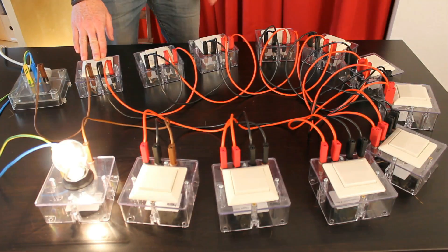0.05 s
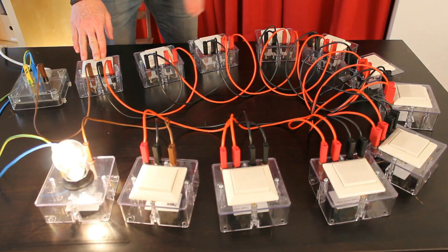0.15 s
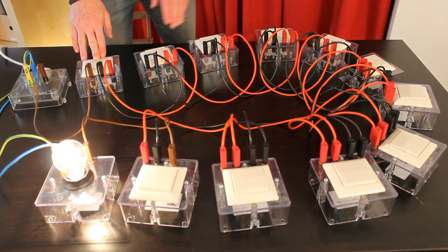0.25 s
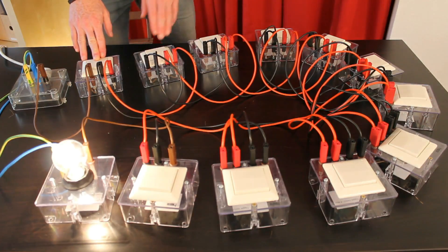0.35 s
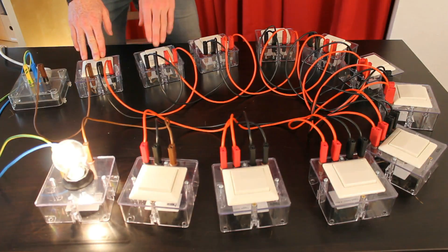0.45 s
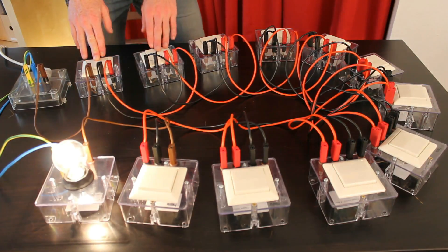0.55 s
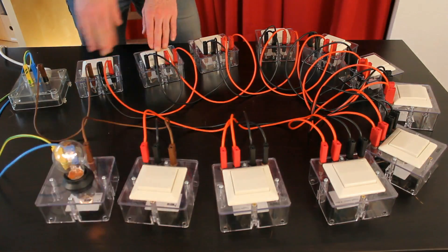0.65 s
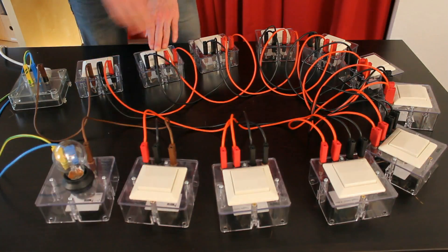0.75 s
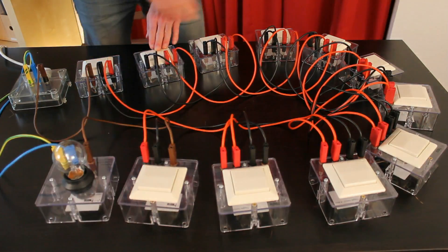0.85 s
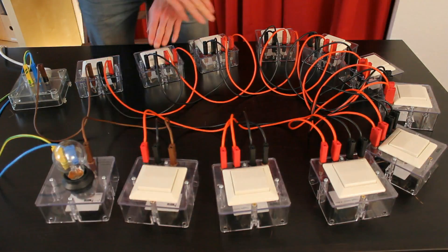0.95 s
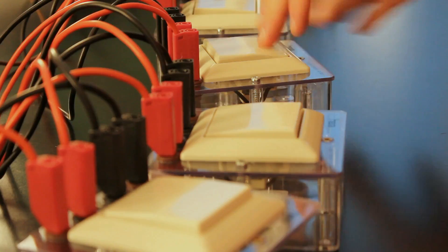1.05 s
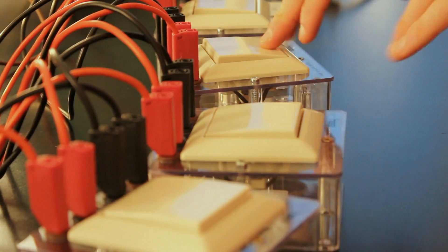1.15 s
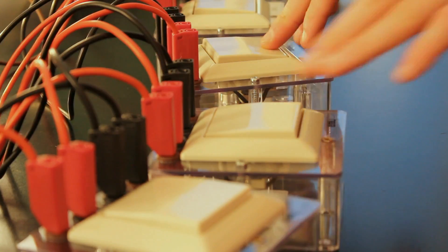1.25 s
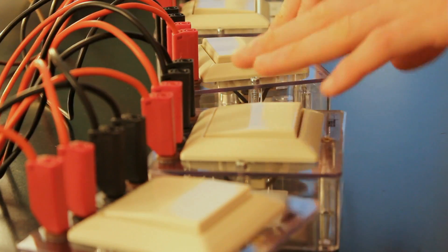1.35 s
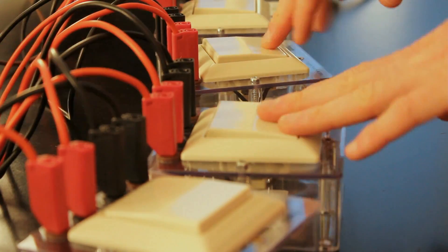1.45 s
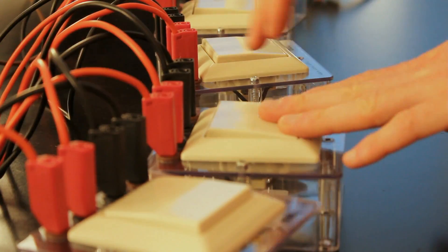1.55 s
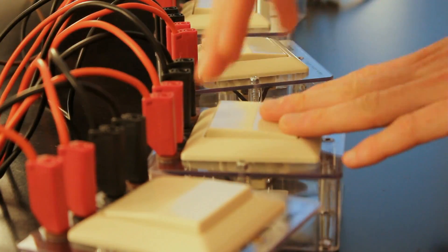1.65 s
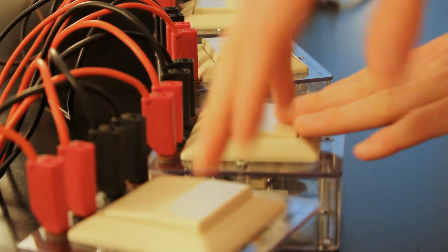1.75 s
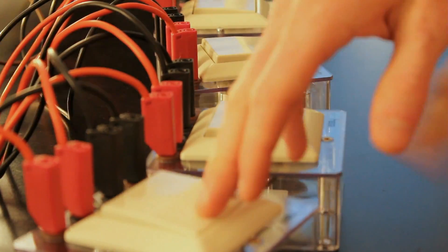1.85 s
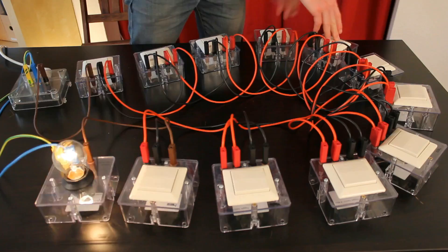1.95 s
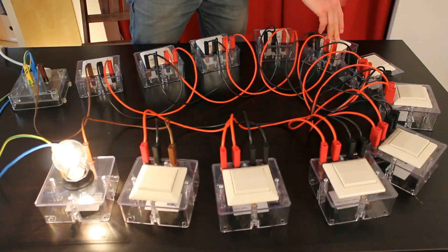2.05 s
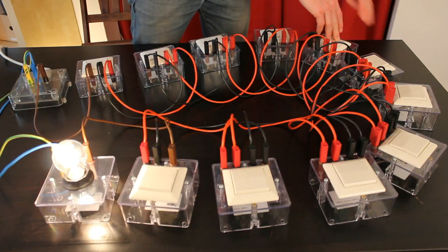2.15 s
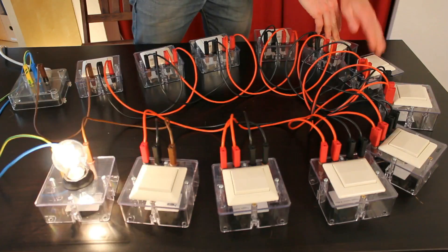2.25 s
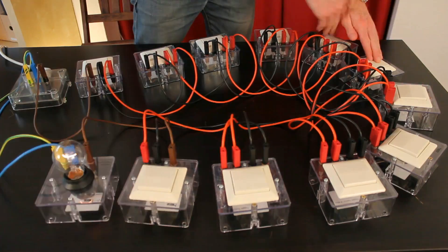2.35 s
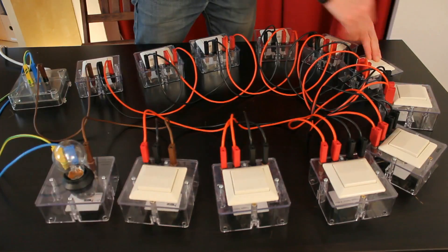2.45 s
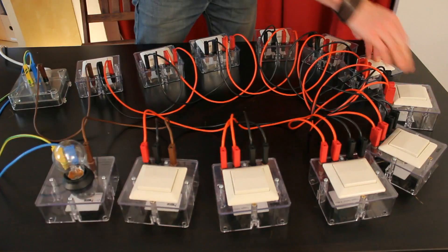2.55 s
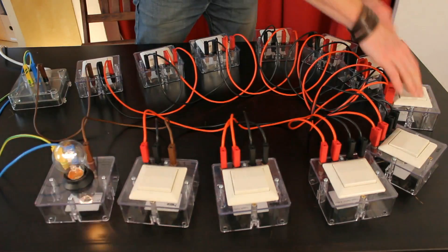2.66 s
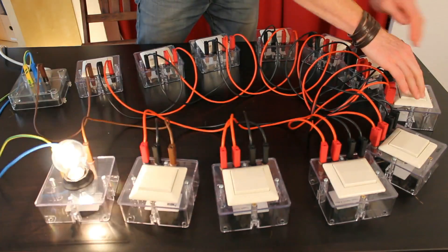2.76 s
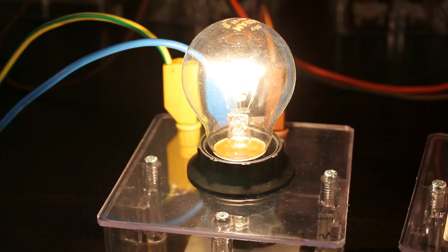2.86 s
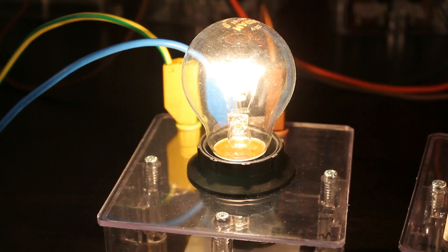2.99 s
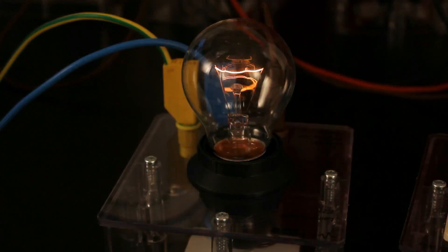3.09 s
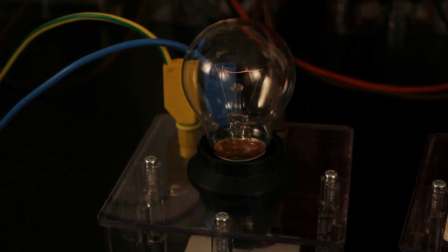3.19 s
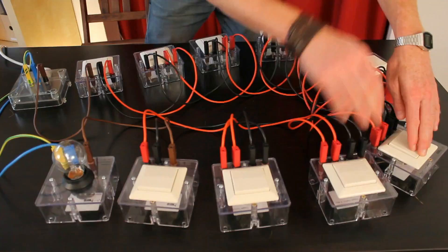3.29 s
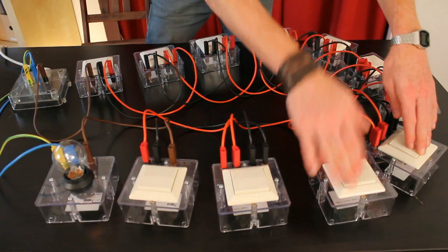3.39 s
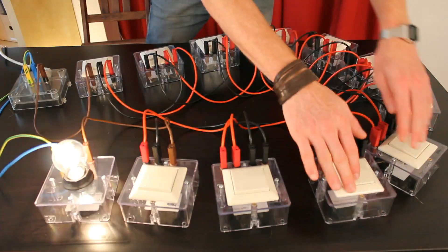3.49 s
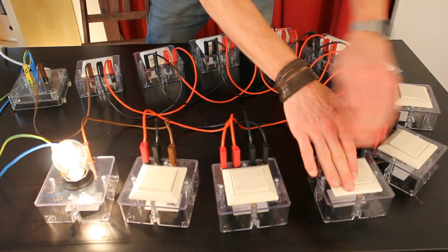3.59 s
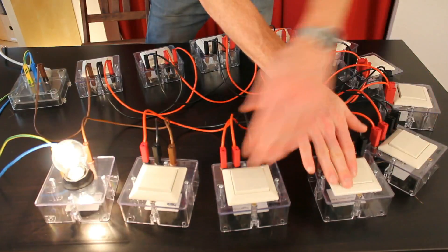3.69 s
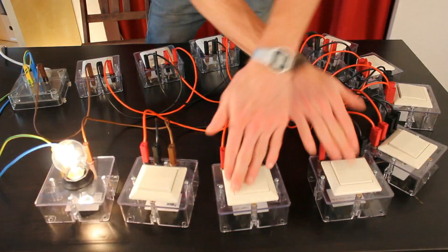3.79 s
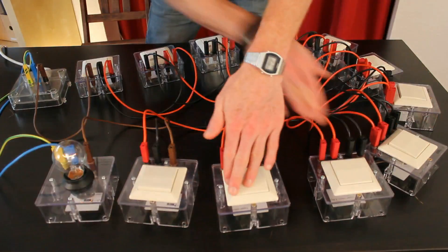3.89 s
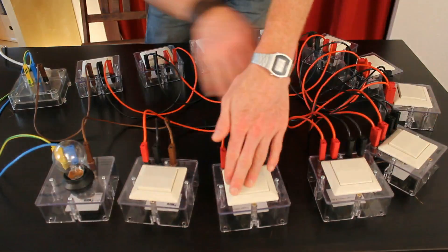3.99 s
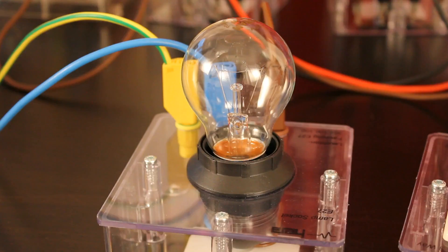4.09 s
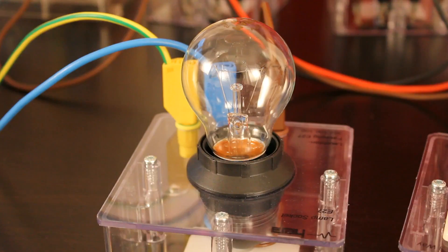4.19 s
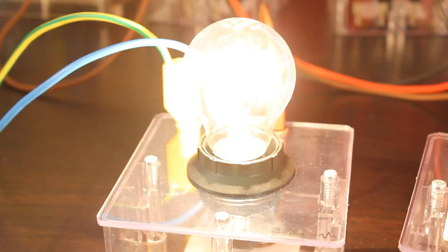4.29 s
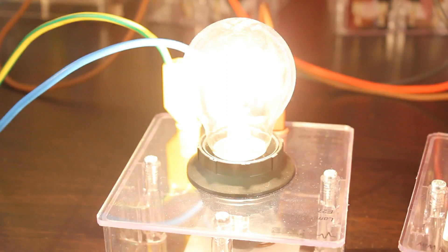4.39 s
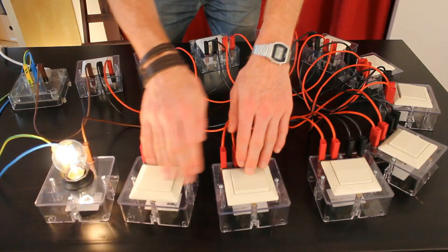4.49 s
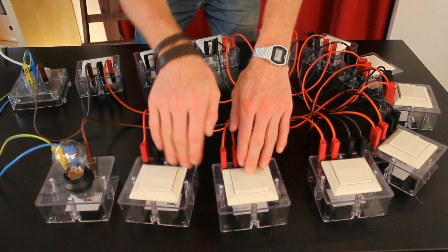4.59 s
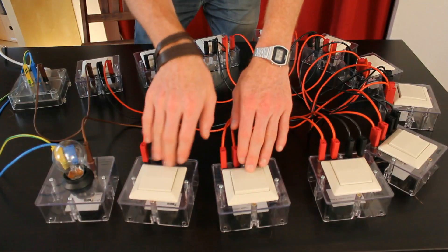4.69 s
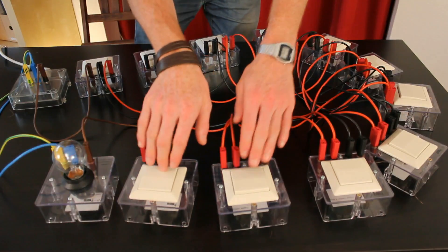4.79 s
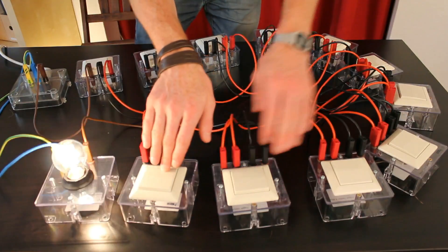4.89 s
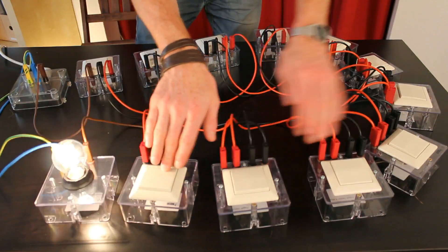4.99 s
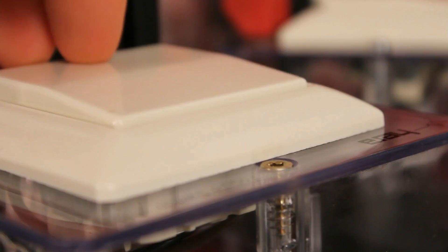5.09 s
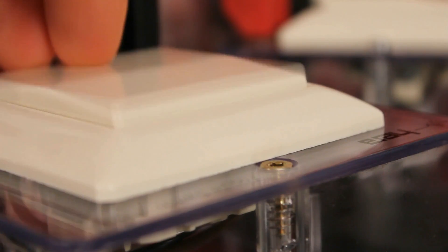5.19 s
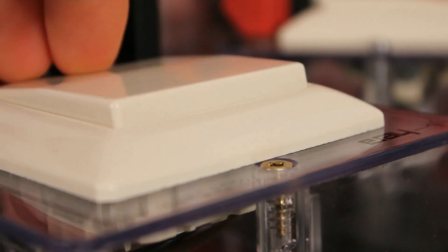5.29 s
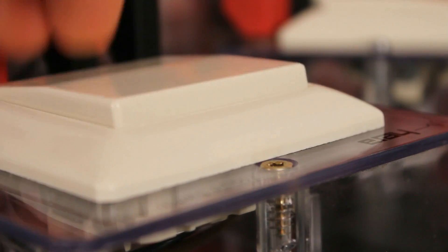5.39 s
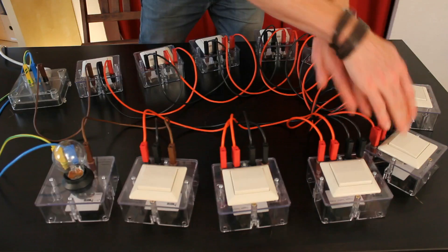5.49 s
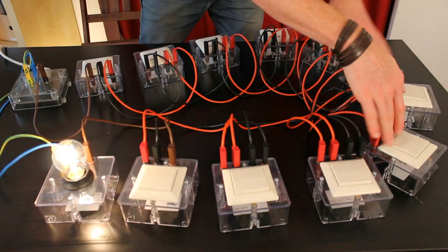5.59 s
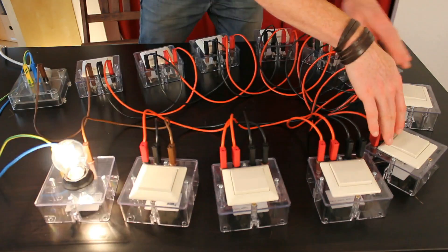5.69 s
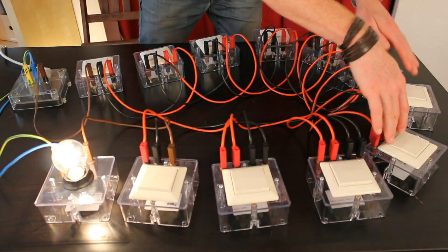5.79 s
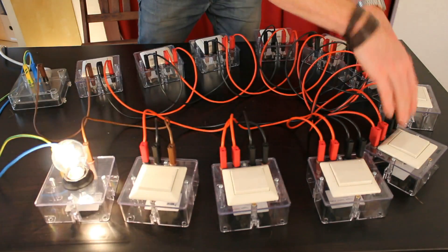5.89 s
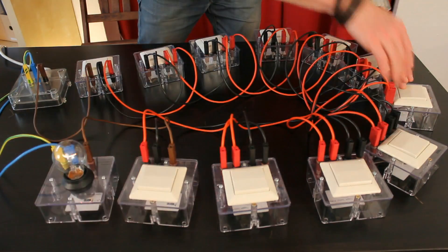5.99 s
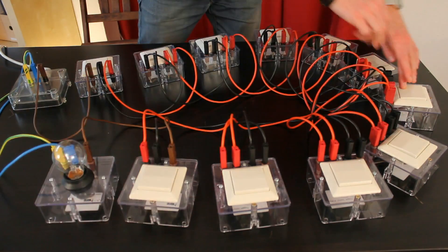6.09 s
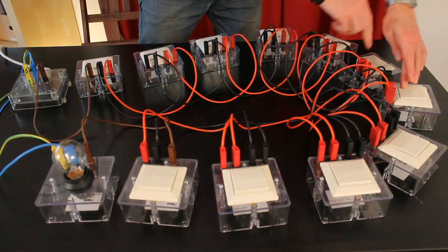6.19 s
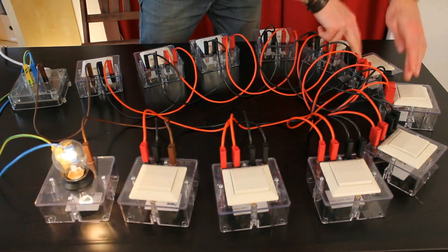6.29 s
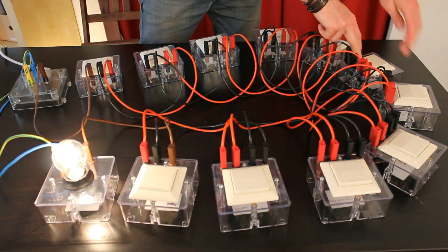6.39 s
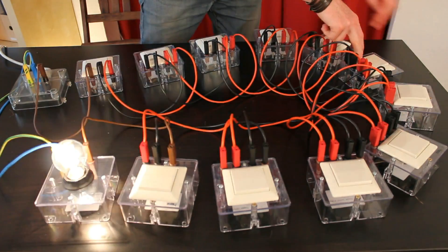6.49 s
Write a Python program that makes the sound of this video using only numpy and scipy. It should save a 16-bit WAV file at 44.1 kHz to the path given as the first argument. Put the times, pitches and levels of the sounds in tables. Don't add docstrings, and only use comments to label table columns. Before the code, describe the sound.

A brisk, even run of crisp plastic switch clacks with tiny metallic ticks and low table thuds, close up in a quiet, slightly live room.

```python
import sys
import numpy as np
from scipy import signal
from scipy.fft import irfft
from scipy.io import wavfile

SR = 44100
rng = np.random.default_rng(int(sys.argv[2]) if len(sys.argv) > 2 else 0)


def generate_wav(sig):
    pcm = np.round(np.clip(np.atleast_2d(sig).T, -1, 1) * 32767).astype(np.int16)
    wavfile.write(sys.argv[1], SR, pcm)


def makeup_ratio(level_db):
    decades = np.asarray(level_db, float) / 20
    return 10 ** decades


N = 288816

# start_s, box_db, table_db, tick_db, long_ring_db
PRESSES = [(0.699, -29, -28, -37.5, -30.5), (1.122, -27.5, -33, -34.5, -29),
           (1.523, -32.5, -33.5, -38.5, -34.5), (2.013, -32.5, -35, -40.5, -33),
           (2.383, -28, -40.5, -45, -33.5), (2.762, -31, -34.5, -37.5, -46),
           (3.127, -26.5, -27.5, -35, -32), (3.503, -33, -34.5, -36, -28.5),
           (3.899, -27.5, -37.5, -36.5, -34.5), (4.293, -26.5, -39, -45, -36),
           (4.59, -27, -32.5, -35.5, -32.5), (4.924, -29.5, -36.5, -40, -44.5),
           (5.275, -27.5, -34.5, -36, -27.5), (5.658, -33.5, -35.5, -37.5, -40),
           (6.021, -34.5, -31, -41.5, -30.5), (6.385, -35, -33.5, -37.5, -34)]
# box_hz, table_hz, long_table_hz, long_box_hz, plate_hz
SWITCHES = [(1110, 401, 330, 1300, 2650), (825, 222, 290, 1200, 3100), (1230, 618, 291, 1100, 4400),
            (1096, 542, 220, 1800, 5300), (890, 527, 250, 1090, 4500), (690, 345, 436, 1235, 3600),
            (1386, 368, 260, 2500, 2800), (1146, 540, 260, 3000, 4800), (870, 217, 339, 1000, 2430),
            (1406, 470, 210, 1200, 3700), (1015, 554, 217, 670, 4300), (860, 570, 150, 980, 2670),
            (1156, 351, 219.5, 1600, 4300), (1010, 388, 250, 1800, 4400), (1490, 270, 260, 1400, 7900),
            (1480, 230, 292, 1800, 8300)]
# pitch_hz, level_db per Hz
TICK = [(1180, -57), (2000, -15.5), (2440, -9.5), (2910, -8.5), (3870, -6), (4450, -3), (5830, -4),
        (8930, -1), (14900, -11), (16000, -32)]
BODY_LAG_S = .0015


def evened(x, count=None):
    return x / np.sqrt(np.mean(x[..., :count] ** 2) + 1e-20)


def read(points, hz):
    f, value = np.transpose(points)
    return np.interp(np.log(hz + 1), np.log(f + 1), value)


def add(mix, s, sound):
    part = mix[:, round(s * SR):][:, :sound.shape[1]]
    part += sound[:, :part.shape[1]]


LENGTH = 12800


def presses(mix):
    for press, switch in zip(PRESSES, SWITCHES):
        s, box_db, table_db, tick_db, ring_db = press
        box_hz, table_hz, low_hz, high_hz, plate_hz = switch
        snap = knock(s, box_db, box_hz, table_db, table_hz, tick_db, TICK, 0.00029, 0.0019, 4.57, plate_hz)
        add(mix, s - .0012, snap)
        add(mix, s - .0008, ping(tick_db + 11, 10200))
        add(mix, s, linger(ring_db, low_hz, 0.28) + linger(box_db - 11.5, high_hz, .27))


def landings(mix):
    # start_s, level_db, skin_tick_db
    fingers = [(0.690, -48, -54), (1.113, -50.5, -55), (1.518, -48.5, -50), (1.994, -58.5, -59),
               (2.005, -37.5, -43.5), (2.380, -41.5, -58), (2.752, -37, -43.5), (3.120, -47, -40.5),
               (3.484, -56, -53), (3.498, -34.5, -37), (3.889, -43, -41.5), (4.286, -39.5, -34),
               (4.583, -43, -37.5), (4.914, -50, -48), (5.267, -42.5, -40), (5.649, -48.5, -48),
               (5.99, -56.5, -71), (6, -51.5, -55.5), (6.358, -63, -65), (6.378, -39.5, -43)]
    palm_hz = 524
    for s, db, tick_db in fingers:
        slap = knock(s, db + 7.5, switch_at(s)[0], db, palm_hz, tick_db, TICK, 0.0022, 0.00608, 9.0)
        add(mix, s - BODY_LAG_S, slap)


def contacts(mix):
    # start_s, level_db, pitch_hz
    meetings = [(0.7068, -28, 5100), (1.1342, -24, 3220), (1.5303, -29, 4300), (2.0271, -26, 4570),
                (2.402, -29, 7700), (2.408, -29, 4900), (2.7704, -27, 5560), (3.1331, -41, 6500),
                (3.5047, -32, 8700), (4.2942, -30, 7800), (4.309, -16, 7900), (4.5984, -44, 5000),
                (4.9235, -22, 4030), (5.2742, -24, 3700), (5.6666, -26, 4450), (6.032, -24, 8000),
                (6.0431, -27, 7700), (6.3988, -29, 7840), (6.3915, -33, 10200), (2.02, -26, 10400),
                (4.2885, -32, 3700), (1.1295, -26, 5700), (.8815, -63, 3770), (2.663, -61, 3600)]
    for s, db, hz in meetings:
        add(mix, s - .0004, ping(db, hz))


def bounces(mix):
    # start_s, level_db, table_hz, tick_db
    rebounds = [(.709, -30.5, 379, -44.5), (1.131, -32, 307, -47), (1.144, -35, 228, -63),
                (1.533, -41.5, 356, -54), (2.019, -37.5, 233, -42.5), (2.400, -36.5, 332, -38.5),
                (2.772, -39, 363, -45), (3.137, -34, 327, -42.5), (3.511, -33.5, 327, -49),
                (3.906, -38.5, 215, -52), (4.300, -39.5, 328, -56), (4.31, -43, 470, -49),
                (4.602, -39.5, 600, -52), (4.93, -43, 340, -62), (5.285, -37, 352, -49),
                (5.668, -34, 369, -43), (6.033, -38, 563, -47), (6.394, -44, 295, -48)]
    for s, db, table_hz, tick_db in rebounds:
        blow = knock(s, db - 3.5, switch_at(s)[0], db, table_hz, tick_db, TICK, 0.00023, .0015, 12.0)
        add(mix, s - BODY_LAG_S, blow)


def switch_at(s):
    return SWITCHES[np.argmin(abs(np.transpose(PRESSES)[0] - s))]


def knock(s, box_db, box_hz, table_db, table_hz, tick_db, colour, rise_s, rattle_s, wet_db, plate_hz=0):
    # time_s, distance_m
    distance = [(0, 0.42), (1.1, 0.65), (2.0, 0.96), (2.4, 1.28), (3.1, 0.67), (3.9, 0.9), (4.6, 1.1),
                (5.0, 0.6), (5.3, 0.73), (5.7, 0.68), (6.4, 1.34)]
    # pitch_hz, level_db, t60_s
    box_table = [(800, -6.5, 0.024), (954, -8, 0.044), (1181, -2, 0.036), (1493, -1.5, 0.028),
                 (1700, -7, 0.028), (2246, -4, 0.024), (2975, -1, 0.012), (3700, -30.5, 0.13)]
    # pitch_hz, level_db, t60_s
    top_table = [(232, -5, 0.078), (239.5, -8, 0.08), (315, -14.5, 0.016), (342, -4, 0.12),
                 (402, -3, 0.027), (524, -2, 0.041), (600, 2.5, 0.024)]
    wet_db = wet_db + 20 * np.log10(np.interp(s, *np.transpose(distance)))

    t = np.arange(800) / SR
    force = (1 - np.exp(-(t + 1e-5) / rise_s)) * np.exp(-t / rattle_s)
    impacts = rng.random(len(t)) < 1500 / SR
    rattle = force * rng.standard_normal(len(t)) * impacts
    rattle[np.argmax(force)] = 1.1 * force.max()

    tint = snap_tint(colour, plate_hz)
    crack = signal.fftconvolve(force * rng.standard_normal(len(t)) + 3.6 * rattle, tint)
    space = room()
    tick = heard(crack, tint, space, wet_db + 4.5)

    box_modes = [*box_table, (box_hz, 4.5, .03)]
    box_near = signal.fftconvolve(rattle, ring(box_modes, 3.7))
    box = heard(box_near, ring(box_modes, 0.39, damping=4.23), space, wet_db)
    box = signal.sosfilt(signal.butter(2, 300, "high", fs=SR, output="sos"), box)

    table_modes = [*top_table, (table_hz, 9.5, .055)]
    builds = 1 - np.exp(-np.arange(4500) / SR / 0.0012)
    table_near = builds * ring(table_modes, 0.7, detune=0.013)
    table = heard(table_near, ring(table_modes, 4.2, damping=2.36), space, wet_db - 4.0)
    table = signal.sosfilt(signal.butter(2, 150, "high", fs=SR, output="sos"), table)

    body = makeup_ratio(box_db - 7.0) * box + makeup_ratio(table_db - 1.55) * table
    body = np.pad(body, ((0, 0), (round(BODY_LAG_S * SR), 0)))
    return body[:, :LENGTH] + makeup_ratio(tick_db - 0.4) * tick


def snap_tint(colour, plate_hz):
    # pitch_hz, level_db, t60_s
    spring = [(4390, 3, 0.0042), (6860, -46, 0.03), (8440, 0.5, 0.01), (10750, 0, 0.0064),
              (12400, -4.5, 0.024)]
    tint = np.roll(irfft(makeup_ratio(read(colour, np.fft.rfftfreq(512, 1 / SR)))), 60)
    jangle = ring(spring, 3.0, detune=.05, size=600)
    tint[60:] += 0.32 * jangle[:len(tint) - 60] * np.linalg.norm(tint) / np.linalg.norm(jangle)
    t = np.arange(452) / SR
    plate = makeup_ratio(-60 * t / 0.0098) * np.sin(2 * np.pi * plate_hz * t)
    tint[60:] += 0.23 * plate * np.linalg.norm(tint) / (np.linalg.norm(plate) + 1e-9)
    return tint


def ring(modes, spread_db, damping=1, detune=0.02, size=4500):
    t = np.arange(size) / SR
    luck = rng.standard_normal((len(modes), 2))
    total = np.zeros(size)
    for (hz, db, t60), (u, v) in zip(modes, luck):
        decay = makeup_ratio(db + spread_db * v - 60 * damping * t / t60)
        total += np.sign(u) * decay * np.sin(2 * np.pi * hz * (1 + detune * u) * t)
    return total


def ping(db, hz):
    t = np.arange(400) / SR
    band = signal.butter(2, [3500, 12500], "band", fs=SR, output="sos")
    crack = signal.sosfilt(band, rng.standard_normal(len(t)) * np.exp(-t / 0.00056))
    chime = ring([(hz, 0, .008), (1.57 * hz, -5, .006)], 1.2, size=len(t))
    sound = evened(0.55 * evened(crack) + evened(chime), count=40)
    return makeup_ratio(db - 7.5) * np.array([sound, np.roll(sound, 2)])


def linger(db, hz, t60):
    t = np.arange(LENGTH) / SR
    modes = [(hz, 0, t60), (1.5 * hz, -7, t60)]
    both = ring(modes, 0.67, detune=0.0051, size=len(t))
    apart = ring(modes, 1.5, detune=0.0265, size=len(t)) * np.array([[1], [-1]])
    return makeup_ratio(db + 2.0) * (both + 0.35 * apart) * (1 - np.exp(-t / 0.038))


def thumps(mix):
    # start_s, level_db, pitch_hz, legs_db
    pushes = [(0.63, -58, 83.5, -62), (0.693, -40, 148, -46), (0.883, -42.5, 140, -44),
              (0.972, -45.5, 125, -60), (1.117, -33.5, 177, -43), (1.403, -48, 143.6, -63),
              (1.522, -52, 140, -49), (2.01, -44, 146, -48), (2.382, -44, 119.4, -49.5),
              (2.762, -34.5, 101.3, -40), (3.125, -38.5, 120, -56), (3.501, -42.5, 139, -55),
              (3.752, -70, 163, -62), (3.9, -46, 123.2, -51), (4.291, -35.5, 119, -50),
              (4.587, -42.5, 109.5, -44), (4.919, -40.5, 102.3, -46), (5.273, -41, 140.6, -42.5),
              (5.657, -45.5, 161, -45.5), (6.018, -43, 98, -48), (6.381, -36.5, 134.5, -38.5)]
    for s, db, hz, legs_db in pushes:
        add(mix, s, thump(db, hz, legs_db))


def thump(db, hz, legs_db):
    # pitch_hz, level_db, t60_s
    legs = [(53, -4.5, 0.45), (77, 2, 0.46)]
    t = np.arange(LENGTH) / SR
    modes = [(105, -9, .25), (145, -8, .2), (hz, 1.5, .3)]
    both = ring(modes, 6.1, size=len(t))
    apart = ring(modes, 8.4, size=len(t)) * np.array([[1], [-1]])
    flex = (both + 0.27 * apart) * (1 - np.exp(-t / 0.0094))
    rock = ring(legs, 1.5, detune=0.035, size=len(t)) * (1 - np.exp(-t / 0.017))
    return makeup_ratio(db - 7.5) * evened(flex, count=2000) + makeup_ratio(legs_db) * rock * np.array([[.92], [1.08]])


def touches(mix):
    # start_s, box_db, table_db, table_hz, brush_db
    strays = [(0.593, -64, -60, 360, -63.5), (0.627, -51, -47.5, 337, -60), (0.656, -58, -67, 223, -57),
              (.880, -56, -42, 175, -54), (0.974, -46.5, -45, 338, -62), (1.400, -45.5, -50.5, 467, -62),
              (1.408, -67, -39.5, 285, -72), (1.832, -62, -60, 305, -71), (2.662, -61, -67, 282, -58),
              (3.245, -61, -48, 355, -64), (3.756, -45.5, -45.5, 178, -77), (4.453, -61, -52.5, 313, -78),
              (4.871, -64, -63, 269, -81), (6.284, -63, -61, 310, -85)]
    # pitch_hz, level_db per Hz
    skin = [(1200, 0.5), (2500, -11), (3700, -2.5), (5000, -9), (8000, -11), (14000, -14)]
    box_hz, lid_hz = 1300, 3900
    for s, box_db, table_db, table_hz, brush_db in strays:
        brush = knock(s, box_db, box_hz, table_db, table_hz, brush_db, skin, 0.00019, 0.001, 10.4, lid_hz)
        add(mix, s - .002, brush)


def heard(direct, spread, tail, wet_db):
    echoes = signal.fftconvolve(spread[None] / np.linalg.norm(spread), tail, axes=1)[:, :LENGTH]
    near = np.pad(direct / np.linalg.norm(direct), (2, LENGTH))
    near = np.array([near[2:LENGTH + 2], near[:LENGTH]])
    return evened(near + makeup_ratio(wet_db) * echoes, count=900)


def room():
    # pitch_hz, t60_s
    decay = [(80, 0.87), (210, 0.34), (560, 0.29), (1470, 0.29), (3880, 0.3), (10200, 0.23)]
    # pitch_hz, likeness (-1 to 1)
    same = [(60, 0.85), (110, 0.23), (200, 0.95), (380, 0.61), (700, 0.78), (1290, 0.6), (2380, 0.77),
            (4400, 0.48), (8120, -0.39), (15000, -0.15)]
    tail = pair_noise(LENGTH, 256, same, lambda hz, t: -60 * t / read(decay, hz))
    t = np.arange(LENGTH) / SR
    tail = tail * np.clip((t - .0015) / 0.0056, 0, 1)
    tail = tail / np.linalg.norm(tail[0])
    when, side = rng.random((2, 6))
    at = (SR * (.002 + .022 * when)).astype(int)
    for ear, lag in enumerate((0 * at, np.round(4 * side - 1).astype(int))):
        tail[ear, at + lag] += 0.19 * np.sign(side - .4)
    return tail


def air():
    # pitch_hz, level_db per Hz
    colour = [(12, -34), (20, -9.5), (27, -34), (60, -11), (393, -19.5), (428, -21.5), (772, -27),
              (839, -27.5), (1470, -30), (1600, -31), (11100, -36.5), (15200, -37), (16500, -93)]
    # pitch_hz, likeness (-1 to 1)
    same = [(60, 0.46), (240, 0.018), (950, 0.45), (3770, -0.23), (15000, 0.091)]
    hush = pair_noise(N, 2048, same, lambda hz, t: read(colour, hz) + 0 * t)
    return makeup_ratio(-61.5) * evened(hush)


def pair_noise(count, size, same, shape_db):
    hop = size // 4
    hz = np.fft.rfftfreq(size, 1 / SR)[:, None]
    t = np.arange(count // hop + 2) * hop / SR
    a, b, c, d = rng.standard_normal((len(t), len(hz), 4)).T
    like = np.clip(read(same, hz), -1, 1)
    left = a + 1j * b
    right = like * left + np.sqrt(1 - like ** 2) * (c + 1j * d)
    z = np.array([left, right]) * makeup_ratio(shape_db(hz, t))
    return signal.istft(z, nperseg=size, noverlap=size - hop)[1][:, :count]


def scene():
    mix = np.zeros((2, N))
    for layer in (presses, landings, contacts, bounces, thumps, touches):
        layer(mix)
    no_rumble = signal.butter(2, 45, "high", fs=SR, output="sos")
    balance = makeup_ratio([[-.9], [.9]])
    return signal.sosfilt(no_rumble, mix) * balance + air()


def band_limit(x):
    return signal.sosfilt(signal.butter(12, 16670, fs=SR, output="sos"), x)


def record(dry):
    edge = signal.firwin(255, 16000, window=("kaiser", 8), fs=SR)
    offset = -.00185
    finished = signal.oaconvolve(dry, edge[None], "same") + offset
    return band_limit(finished)


dry = scene()
out = record(dry)
generate_wav(out)
```